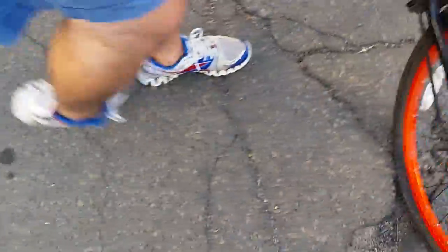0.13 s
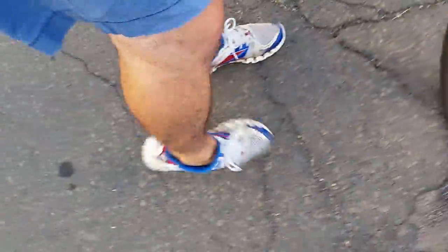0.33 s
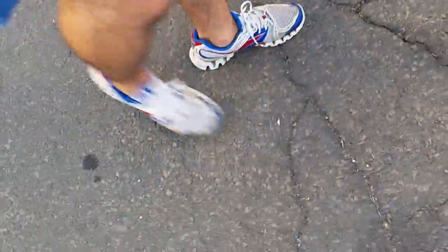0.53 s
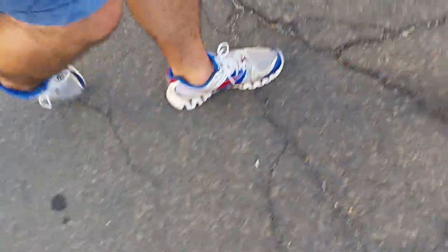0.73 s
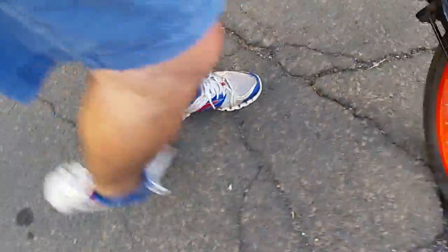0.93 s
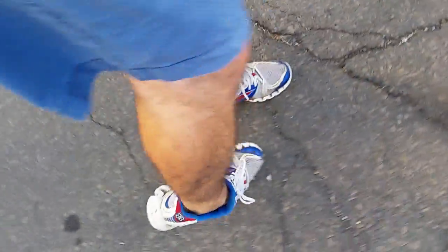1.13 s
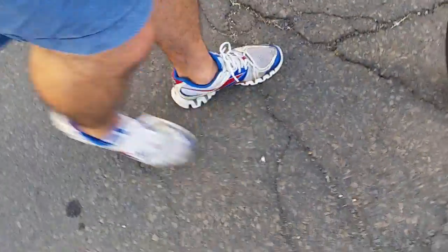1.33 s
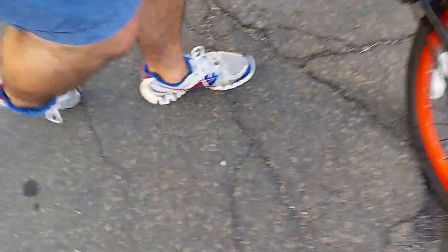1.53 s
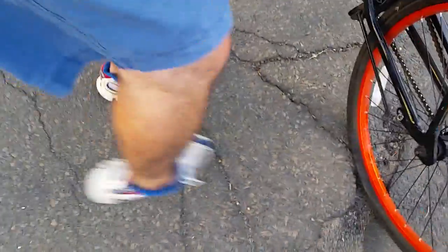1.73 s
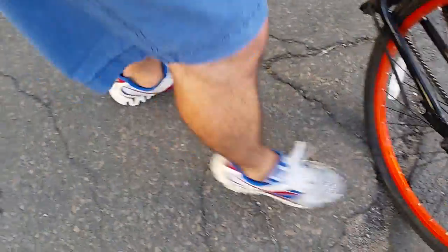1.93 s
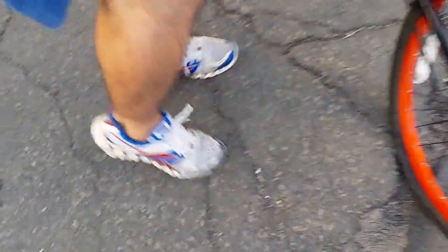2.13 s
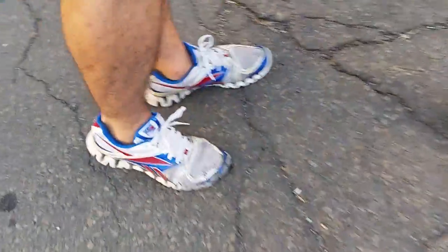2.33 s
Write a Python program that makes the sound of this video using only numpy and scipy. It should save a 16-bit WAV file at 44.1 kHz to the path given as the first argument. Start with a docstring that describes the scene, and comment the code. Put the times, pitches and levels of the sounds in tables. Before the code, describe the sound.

Rubber soles scraping on gritty pavement, three harsh scuffs with softer drags between, close and dry.

```python
"""Running shoes drag over rough asphalt: three heavy scuffs alternate with two lighter slides, then a soft brush.
Noise of random slips is shaped into grit rasp and fizz, or rings sole and tread resonances for judder and chatter.
Along the way noise bursts crack as stones and damped sines snap as tread blocks; shudders come under load, and
narrow-band chirrs as each slide ends. The shoes leave a faint echo.
Throughout, shaped noise makes a low street rumble and a little wind on two microphone ports."""
import sys
import numpy as np
from scipy import signal
from scipy.fft import rfft, irfft, next_fast_len
from scipy.io import wavfile
from scipy.ndimage import uniform_filter1d, map_coordinates

SR = 44100
rng = np.random.default_rng(int(sys.argv[2]) if len(sys.argv) > 2 else 0)


def persist_wave(psi):
    """Save psi, clipped to +-1, as 16-bit WAV."""
    counts = np.round(np.clip(psi, -1, 1) * 32767).astype(np.int16)
    wavfile.write(sys.argv[1], SR, np.atleast_2d(counts).T)


N = 109015

# heavy strokes, before layer trims: t/s, grit rasp/dB, sole judder/dB, tread chatter/dB, top-treble fizz/dB
SCUFFS = [
    [(0, -54, -52, -55, -58), (.05, -46.5, -49, -54, -48), (.082, -35.5, -42, -45, -39),
     (.09, -29.5, -37, -42, -32.5), (.12, -33, -40, -35, -37), (.22, -33.5, -29.5, -31, -35),
     (.32, -28, -24, -29, -30.5), (.378, -27.5, -42, -34.5, -34), (.42, -28.5, -44, -29.5, -29.5),
     (.487, -40, -37.5, -31, -35), (.508, -47, -65, -51, -42), (.53, -61, -62, -69, -47)],
    [(.912, -51, -52, -51, -55), (.932, -34, -35, -38, -39.5), (.965, -31.5, -35, -32, -37),
     (1.005, -26.5, -23, -25, -30), (1.05, -25, -23, -24.5, -28), (1.12, -25, -24.5, -30, -28),
     (1.135, -27.5, -35.5, -39, -28), (1.147, -54, -52, -59, -53), (1.19, -55, -56, -60, -50)],
    [(1.672, -58, -51, -48, -61), (1.685, -36, -40.5, -38.5, -40), (1.738, -28, -34, -28, -40),
     (1.756, -21.5, -31, -26.5, -24), (1.775, -26.5, -26.5, -28, -32), (1.812, -23.5, -17.5, -23.5, -25.5),
     (1.85, -23, -23, -34, -26.5), (1.875, -23.5, -36, -30, -29), (1.887, -20.5, -31, -20, -25),
     (1.895, -44, -42, -37, -46)],
]
# lighter strokes, same columns
SLIDES = [
    [(.54, -48, -67, -64, -54), (.565, -40.5, -53, -54, -37.5), (.608, -32.5, -41, -39.5, -30),
     (.705, -30.5, -37, -31.5, -27), (.742, -37, -38, -36.5, -35), (.76, -40.5, -49, -43, -43),
     (.797, -44, -52, -42, -56), (.825, -60, -57, -54, -62)],
    [(1.2, -55, -65, -60, -52), (1.25, -54, -69, -68, -51), (1.29, -51, -58, -65, -47),
     (1.33, -42, -61, -45, -38), (1.4, -46, -47.5, -49, -45), (1.465, -33.5, -41, -34, -34),
     (1.505, -40, -48.5, -44, -43), (1.55, -45, -47.5, -39, -49), (1.59, -60, -62, -53.5, -77)],
]
RASP_TRIM_DB, JUDDER_TRIM_DB, CHATTER_TRIM_DB, FIZZ_TRIM_DB = 2.5, -1, -1, 2
# spectrum of grit rasp: f/Hz, level/dB
RASP_SPECTRUM = [(300, -16), (1200, -10), (2100, -1), (3000, -2), (4400, -0.5), (6200, -2.5), (7800, -0.5),
                 (9500, -15), (11500, -13.5), (16000, -14)]
# spectrum of grit fizz: f/Hz, level/dB
FIZZ_SPECTRUM = [(3000, -39), (8500, -10), (10200, -8), (12000, -3.5), (13600, 5.5), (15000, 0.5),
                 (16000, -4)]
# resonances of the sole: f/Hz, width/Hz, level/dB
SOLE_MODES = [(176, 88, -7.5), (383, 102, -2), (460, 130, 0), (659, 205, -2.5)]
# resonances of the tread: f/Hz, width/Hz, level/dB
TREAD_MODES = [(802, 150, -3), (1064, 255, 1), (1440, 530, -4.5)]
# loose stones cracking: t/s, level/dB at onset, band centre f/Hz
STONES = [(0.088, -21.5, 8000), (0.096, -18, 11000), (.255, -38, 6000), (0.368, -19, 5500),
          (.377, -18, 6000), (0.398, -16.5, 5000), (.408, -28, 4500), (.475, -23, 2600), (.86, -42, 14000),
          (0.975, -20.5, 11100), (1.16, -26.5, 13000), (1.294, -27.5, 4440), (1.332, -36, 6100),
          (1.482, -22, 12300), (1.638, -37, 3470), (1.682, -41, 5960), (1.706, -25, 7500),
          (1.732, -27, 7000), (1.755, -23, 11100), (1.756, -16, 4450), (1.83, -17, 5500),
          (1.886, -13, 12000), (2.124, -35.5, 2440)]
STONE_T60_S, STONE_HALF_WIDTH_OCTAVES = 0.02, 0.85
# tread blocks snapping free, before trim: t/s, level/dB, pitch f/Hz
SNAPS = [(0.398, -11, 1110), (0.474, -21, 1110), (0.786, -22, 1940), (1.044, -7, 800), (1.313, -23, 1080),
         (1.538, -22, 2050)]
SNAP_T60_S, SNAP_ATTACK_S, SNAP_TRIM_DB = 0.0093, 0.00056, 2.5
# weight coming onto the sole: t/s, half length/s, level/dB
SHUDDERS = [(.23, 0.092, -36), (0.327, 0.031, -25), (1.01, .035, -32.5)]
# resonances of the sole's foam: f/Hz, width/Hz, level/dB
FOAM_MODES = [(142, 47, 6.5), (325, 250, -5)]
# unloaded rubber at the end of a slide: t/s, half length/s, level/dB, pitch f/Hz
CHIRRS = [(0.77, 0.015, -34.5, 4400), (0.781, 0.026, -33.5, 3120), (1.52, .03, -36.5, 4900),
          (1.547, 0.026, -36.5, 3000)]
CHIRR_WIDTH_PER_PITCH = 0.27  # of each of two filter passes
SETTLE_S, SETTLE_RISE_20DB_S, SETTLE_T60_S, SETTLE_DB = 2.295, 0.02, 0.14, -41.5
# decay of the outdoor echo: f/Hz, t60/s
ECHO_T60 = [(200, 0.66), (2000, 0.72), (7000, 0.45), (14000, 0.43)]
ECHO_DB = -20
# spectrum of the street rumble: f/Hz, level/dB
STREET_SPECTRUM = [(20, -23), (50, -7), (90, -3), (140, -6), (200, -13), (330, -12.5), (600, -26),
                   (1200, -30), (2500, -35), (4000, -35), (4900, -31.5), (6200, -41), (7500, -32.5),
                   (9500, -56), (14000, -39.5)]
STREET_DB = -40.5
# wind strength, before the side offset: t/s, level/dB
WIND_LEVEL = [(0, -29), (.07, -42), (.095, -27.5), (.2, -40.5), (.32, -34.5), (.45, -29), (.56, -33.5),
              (.62, -46.5), (2.2, -62), (2.31, -35), (2.47, -64)]
# spectrum of wind on a port: f/Hz, level/dB
WIND_SPECTRUM = [(15, -7), (45, -6.5), (90, -3.5), (160, -14), (300, -33), (1000, -52)]
WIND_SIDE_DB = 4.5  # added right, taken off left
# left-right likeness before the ports: f/Hz, correlation
LIKENESS = [(40, 1), (75, 0.82), (125, 0.9), (600, 0.88), (1300, 0.73), (3000, 0.081), (6500, 0.048)]
# balance of the microphone ports: f/Hz, left over right/dB
PORT_BALANCE = [(60, -1), (140, -0.5), (300, 2), (550, 1.5), (800, 2.5), (1200, 0.5), (1800, 7),
                (2750, 12.5), (4200, 17.5), (6400, 23), (8000, 25.5), (9800, 2.5), (11500, 1), (13500, -11),
                (16000, 2)]
PORT_LAG_S, TOP_HZ = 4e-5, 15950


def dragging(catch_db=0.92, catch_rate_hz=190):
    """The sole catches and slips on stones: grit rasps and fizzes, sole and tread ring briefly."""
    rasp_gain, judder_gain, chatter_gain, fizz_gain = stroke_gains()
    rasp = unit(coloured(slips(rate_hz=6000, scatter_db=3.0, smooth=0.77), RASP_SPECTRUM))
    fizz = unit(coloured(slips(rate_hz=4500, scatter_db=0.5, smooth=0.84), FIZZ_SPECTRUM))
    judder = unit(ringing(slips(rate_hz=900, scatter_db=3.5, smooth=0.44), SOLE_MODES))
    chatter = unit(ringing(slips(rate_hz=1200, scatter_db=0.5, smooth=0.44), TREAD_MODES))
    sound = amp(RASP_TRIM_DB) * rasp_gain * rasp
    sound += amp(FIZZ_TRIM_DB) * fizz_gain * fizz
    sound += amp(JUDDER_TRIM_DB) * judder_gain * judder
    sound += amp(CHATTER_TRIM_DB) * chatter_gain * chatter
    return sound * amp(catch_db * wobble(catch_rate_hz))


def stroke_gains():
    """Force and speed of the strokes, heard as four layer gains per sample."""
    rows = sorted(list(row) for stroke in list(SCUFFS) + list(SLIDES) for row in stroke)
    t, *levels_db = np.transpose(rows)
    return [amp(np.interp(np.arange(N) / SR, t, db, right=-120)) for db in levels_db]


def slips(rate_hz, scatter_db, smooth):
    """Tiny random slips of uneven size over smooth rubbing."""
    happens = rng.random(N) < rate_hz / SR
    sizes = happens * amp(scatter_db * rng.standard_normal(N))
    impulses = unit(sizes * rng.standard_normal((2, N)))
    rubbing = smooth * rng.standard_normal((2, N))
    return patchy(spread(impulses + rubbing), depth_db=2.5)


def patchy(x, depth_db):
    """The colour shifts from moment to moment as new stones pass under the sole."""
    z = signal.stft(x, nperseg=512)[2]
    field = rng.standard_normal(z.shape[1:])  # frequency, time; shared by both sides
    field = uniform_filter1d(uniform_filter1d(field, size=4, axis=0), size=5, axis=1)
    return signal.istft(z * amp(depth_db * unit(field)), nperseg=512)[1][:, :N]


def stones():
    """Loose stones crack under the sole: decaying noise bursts, each in its own band."""
    out, t = np.zeros((2, N)), np.arange(2048) / SR
    hz = np.fft.rfftfreq(len(t), 1 / SR)
    colour = amp(along(RASP_SPECTRUM, hz)) + amp(-6 + along(FIZZ_SPECTRUM, hz))
    for s, db, centre_hz in STONES:
        octaves_off = np.log2((hz + 1) / centre_hz)
        band = 1 / (1 + (octaves_off / STONE_HALF_WIDTH_OCTAVES) ** 2)
        burst = irfft(rfft(rng.standard_normal((2, len(t)))) * colour * band)
        add(out, s, amp(db) * unit(burst) * amp(-60 * t / STONE_T60_S))
    return out


def snaps():
    """A tread block springs back with a short damped note."""
    out, t = np.zeros(N), np.arange(2048) / SR
    for s, db, hz in SNAPS:
        decay = amp(db + SNAP_TRIM_DB - 60 * t / SNAP_T60_S)
        attack = 1 - np.exp(-t / SNAP_ATTACK_S)
        add(out, s, decay * attack * np.sin(2 * np.pi * hz * t))
    return out


def shudders():
    """Slow, heavy slips shake the foam of the sole."""
    mono = slips(rate_hz=230, scatter_db=-2.0, smooth=0.77).mean(axis=0)
    shake = unit(ringing(mono, FOAM_MODES))
    return shake * sum(amp(db) * swell(s, half_s) for s, half_s, db in SHUDDERS)


def chirrs():
    """Quick slips of lightly loaded rubber ring in a narrow band."""
    rub = slips(rate_hz=1500, scatter_db=1.5, smooth=0.7)
    out = np.zeros((2, N))
    for s, half_s, db, hz in CHIRRS:
        band = [(hz, CHIRR_WIDTH_PER_PITCH * hz, 0)]
        tone = unit(ringing(ringing(rub, band), band))
        out += amp(db) * swell(s, half_s) * tone
    return out


def settling():
    """The last footfall: a faint brush of grit and a soft pat of the tread."""
    t = np.arange(N) / SR - SETTLE_S
    rise_db = -20 * np.maximum(-t, 0) / SETTLE_RISE_20DB_S
    fall_db = -60 * np.maximum(t, 0) / SETTLE_T60_S
    grit = slips(rate_hz=2200, scatter_db=1.0, smooth=0.7)
    brush = unit(coloured(grit, RASP_SPECTRUM)) + amp(-12) * unit(coloured(grit, FIZZ_SPECTRUM))
    pat = amp(-3) * unit(ringing(grit, TREAD_MODES))
    return amp(SETTLE_DB + rise_db + fall_db) * (brush + pat)


def echo(x):
    """A faint outdoor tail of noise, each frequency dying at its own speed."""
    hz, t, z = signal.stft(rng.standard_normal((2, SR // 2)), SR, nperseg=256)
    decay = amp(-60 * t / along(ECHO_T60, hz)[:, None])
    tail = signal.istft(z * decay, SR, nperseg=256)[1]
    return signal.fftconvolve(x, tail / np.linalg.norm(tail[0]), axes=1)[:, :N]


def street():
    """Steady rumble of distant traffic."""
    return amp(STREET_DB) * unit(coloured(spread(rng.standard_normal((2, N))), STREET_SPECTRUM))


def wind():
    """Moving air buffets each port on its own."""
    level_db = np.interp(np.arange(N) / SR, *np.transpose(WIND_LEVEL))
    side_db = WIND_SIDE_DB * np.array([[-1], [1]])
    return amp(level_db + side_db) * unit(coloured(rng.standard_normal((2, N)), WIND_SPECTRUM))


def amp(db):
    """Decibels to gain."""
    return 10 ** (np.asarray(db) / 20)


def unit(x):
    """Scale to rms 1."""
    return x / np.sqrt(np.mean(x ** 2) + 1e-20)


def along(points, hz):
    """Interpolate (f/Hz, value) points on a log frequency axis."""
    f, v = np.transpose(points)
    return np.interp(np.log(hz + 1), np.log(f + 1), v)


def wobble(rate_hz):
    """A smooth random curve through rate_hz knots a second."""
    knots = rng.standard_normal(int(N * rate_hz / SR) + 4)
    return map_coordinates(knots, [np.arange(N) * rate_hz / SR])


def swell(s, half_s):
    """A bell-shaped envelope around time s, down to 1/e at half_s."""
    return np.exp(-((np.arange(N) / SR - s) / half_s) ** 2)


def add(track, s, sound):
    """Mix a short sound in at time s."""
    part = track[..., round(s * SR):][..., :sound.shape[-1]]
    part += sound[..., :part.shape[-1]]


def filtered(x, response):
    """x times a complex response of frequency."""
    m = next_fast_len(N + SR // 2)  # padded so that tails do not wrap
    return irfft(rfft(x, m) * response(np.fft.rfftfreq(m, 1 / SR)), m)[..., :N]


def coloured(x, spectrum):
    """x through a (f/Hz, level/dB) spectrum."""
    return filtered(x, lambda hz: amp(along(spectrum, hz)))


def ringing(x, modes):
    """x through parallel damped resonances of alternating polarity."""
    def response(f):
        total = 0
        for k, (centre, width, db) in enumerate(modes):
            damping = 1j * f * width
            total = total + (-1) ** k * amp(db) * damping / (centre * centre - f * f + damping)
        return total
    return filtered(x, response)


def spread(pair):
    """Two unrelated signals to left and right: alike in the bass, apart in the treble."""
    def mid_side(hz):
        angle = np.arccos(np.clip(along(LIKENESS, hz), -1, 1)) / 2
        return np.array([np.cos(angle), np.sin(angle)])
    mid, side = filtered(pair, mid_side)
    return np.array([mid + side, mid - side])


def scene():
    """Shoes, their echo, street and wind."""
    shoes = dragging() + settling() + stones() + snaps() + chirrs() + shudders()
    return shoes + amp(ECHO_DB) * echo(shoes) + street() + wind()


def record(dry):
    """The right port is late and muffled but peaks in the top treble; nothing passes above TOP_HZ."""
    def ports(hz):
        lean = amp(along(PORT_BALANCE, hz))
        lag = np.exp(-2j * np.pi * hz * PORT_LAG_S)
        equal_power = np.sqrt(2 / (1 + lean ** 2))
        return np.array([lean, lag]) * equal_power * (hz < TOP_HZ)
    return filtered(dry, ports)


dry = scene()
out = record(dry)
persist_wave(out)
```